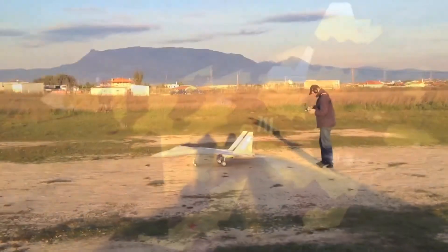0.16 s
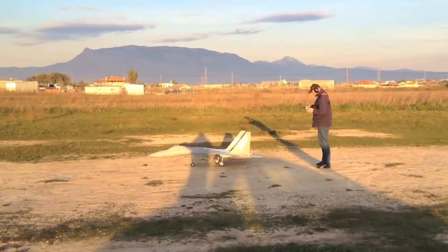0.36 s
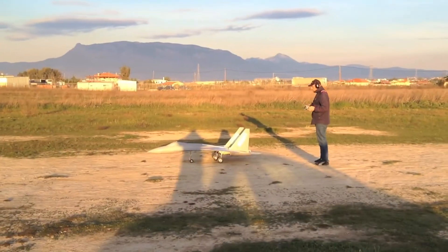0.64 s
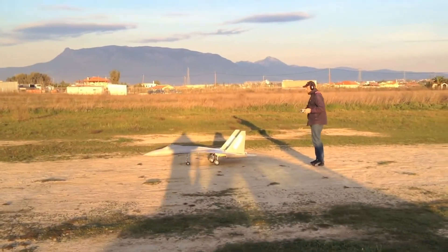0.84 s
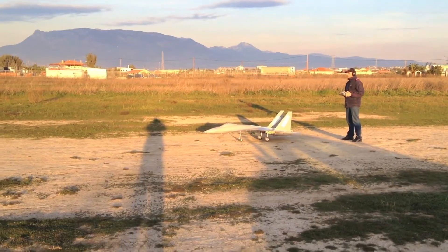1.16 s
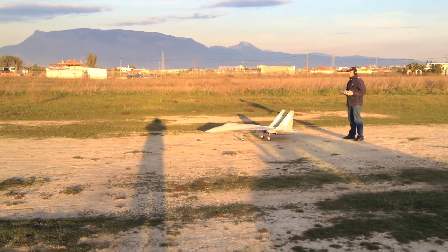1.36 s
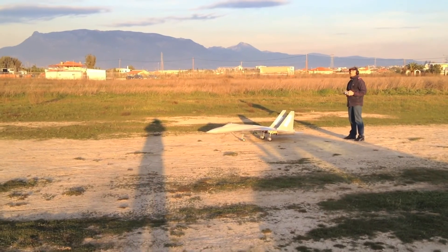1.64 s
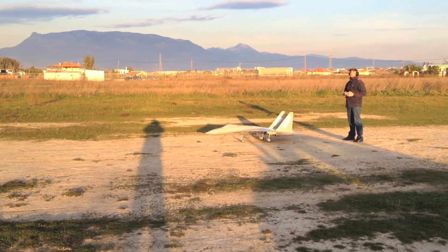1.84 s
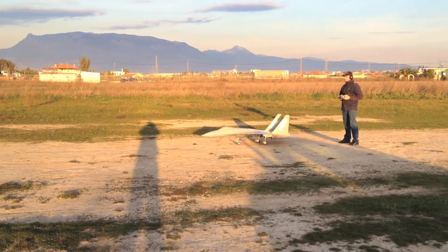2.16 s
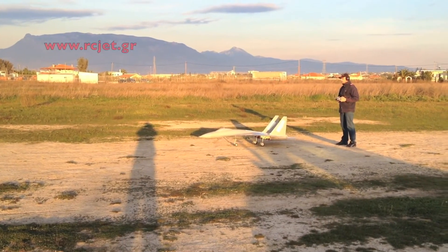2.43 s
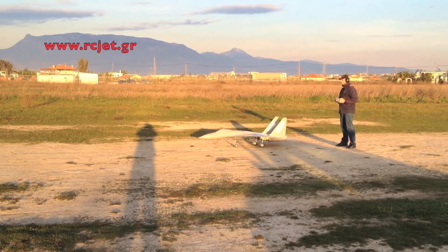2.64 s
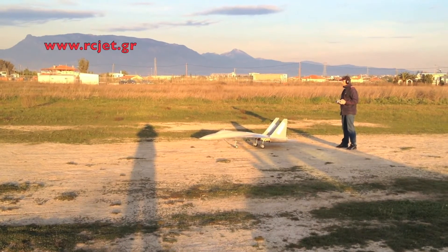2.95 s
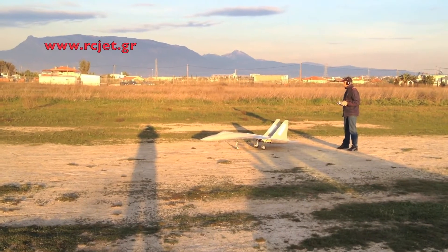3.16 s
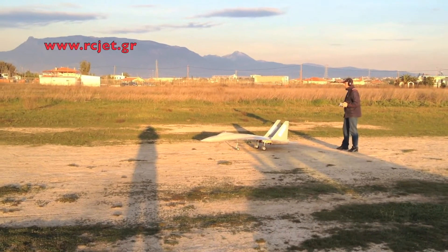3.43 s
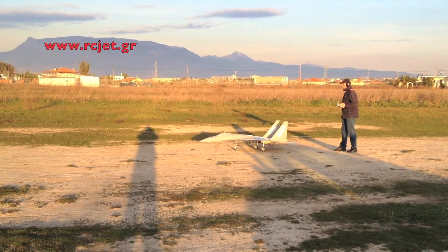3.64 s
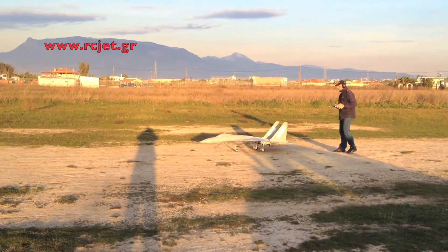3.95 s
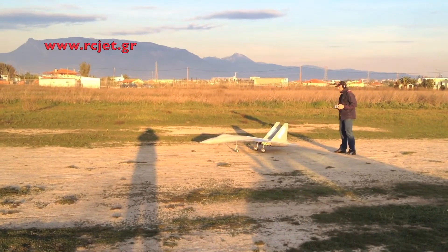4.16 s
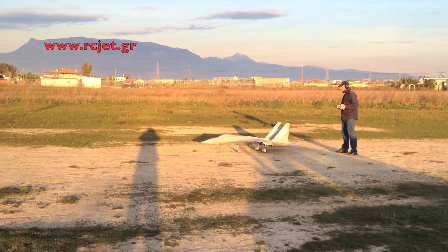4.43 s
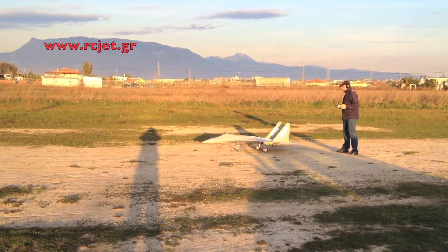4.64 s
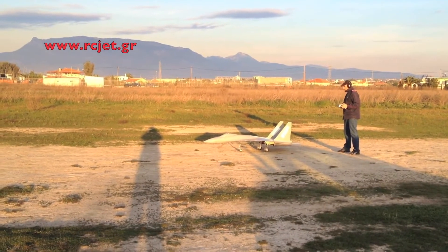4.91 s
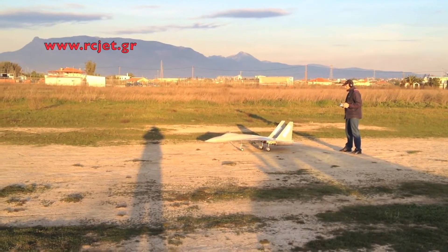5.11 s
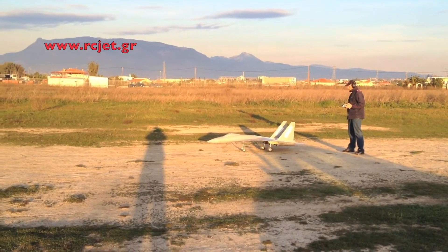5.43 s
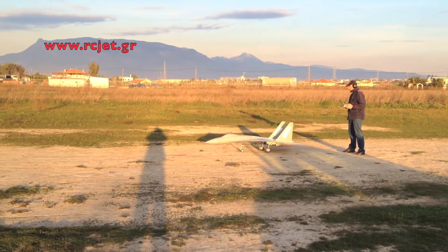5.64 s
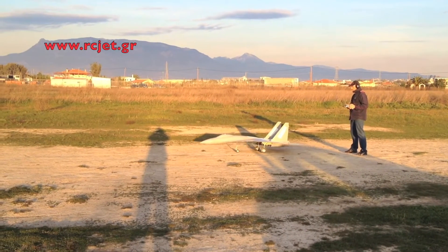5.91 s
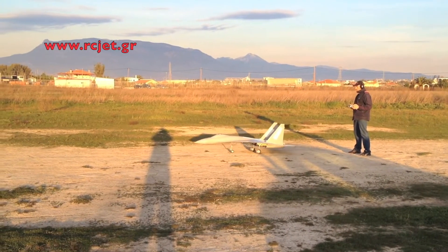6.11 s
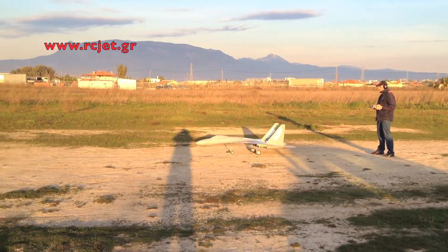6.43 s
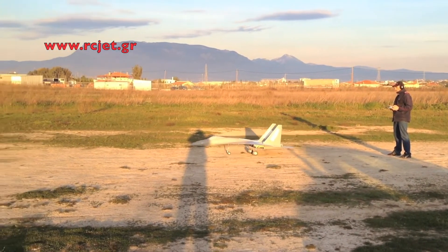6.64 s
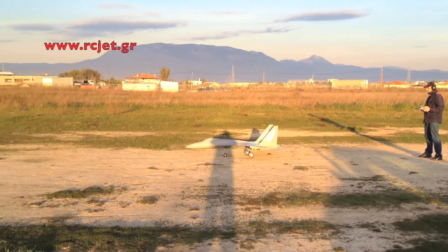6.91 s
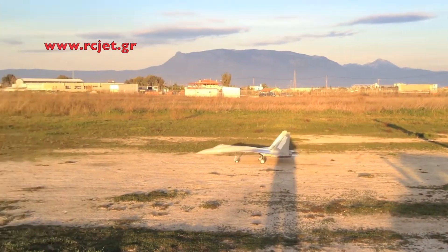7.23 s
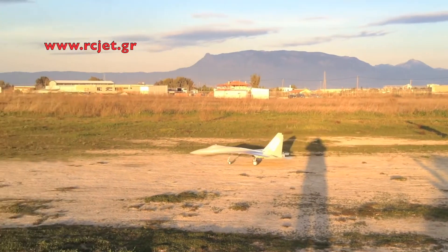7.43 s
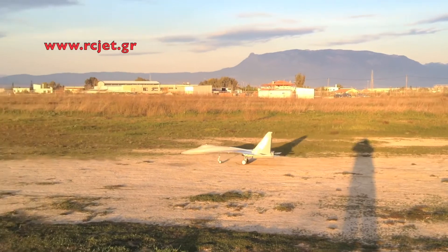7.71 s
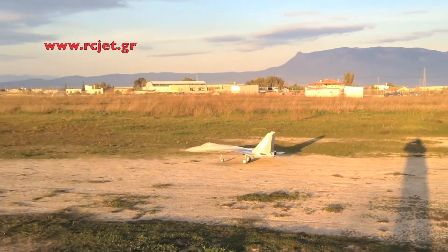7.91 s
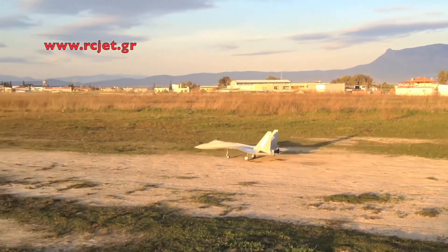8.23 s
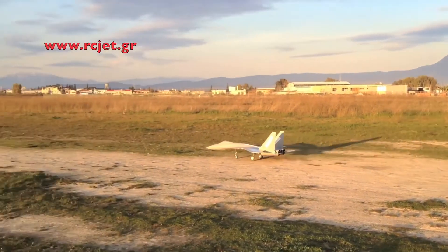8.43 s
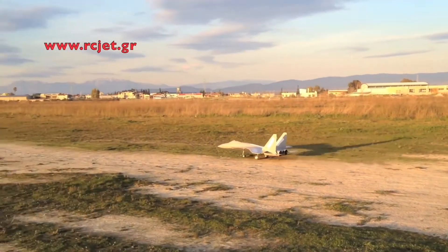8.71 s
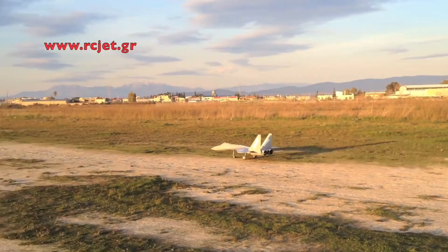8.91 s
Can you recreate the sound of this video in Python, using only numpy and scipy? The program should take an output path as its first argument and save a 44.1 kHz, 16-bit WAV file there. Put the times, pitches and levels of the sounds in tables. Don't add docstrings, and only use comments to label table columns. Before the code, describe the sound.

On an open airfield, two small model jet turbines idle with a high wavering whine over hissing roar. After about a second an abrupt cut brings a shriller held whine, beating slowly. From four seconds it climbs steeply, a low combustion howl rises, and the roar swells as the plane rolls past and away. Mono camera microphone, thin bass, ragged narrow treble.

```python
import sys
import numpy as np
from scipy import signal
from scipy.io import wavfile
from scipy.ndimage import uniform_filter1d

SR = 44100
rng = np.random.default_rng(int(sys.argv[2]) if len(sys.argv) > 2 else 0)


def transcribe(u):
    v = np.clip(np.atleast_2d(u).T, -1, 1)
    q = np.round(v * 32767).astype(np.int16)
    wavfile.write(sys.argv[1], SR, q)


def nominal_scale(level):
    x = np.asarray(level, float) / 20
    return 10 ** x


N = 399987
CUT_S = 0.968

# start_s, blade_hz
RUN_SPEED = [(.97, 5626), (2.07, 5752.5), (2.97, 5787.8), (3.77, 5910), (4.07, 5930), (4.27, 6024),
             (4.47, 6216.7), (4.68, 6520), (5, 7097), (5.32, 7878), (5.7, 9076), (5.85, 9450),
             (6.45, 11162), (6.75, 11439), (7.55, 11449), (7.8, 11581), (8.3, 12322), (9.1, 12576)]
# centre_hz, width_hz, level_db
HOUSING = [(348, 71, 3.5), (1100, 120, 0), (1365, 50, 2.5), (2220, 120, -1.5), (2500, 530, 1.5),
           (1620, 160, -1.5), (1865, 320, 2), (2967, 195, -8), (3484, 650, -4), (4180, 180, -3.5),
           (4570, 350, 4), (4863, 153, -12.5), (5360, 240, 4), (5866, 114, -9.5), (7190, 750, 2),
           (8250, 240, -7.5), (8900, 270, 2.5), (10250, 910, -10.5), (11160, 1560, 5), (12600, 250, -2),
           (13130, 250, -9), (14300, 330, -2), (15050, 300, -1)]


def evened(x):
    return x / np.sqrt(np.mean(x ** 2) + 1e-20)


def follow(rows, t):
    s, *columns = np.transpose(rows)
    return [np.interp(t, s, c) for c in columns]


def read(points, hz):
    f, value = np.transpose(points)
    return np.interp(np.log(hz + 1), np.log(f + 1), value)


def resonances_db(hz, bumps):
    return sum(db / (1 + (2 * (hz - f) / width_hz) ** 2) for f, width_hz, db in bumps)


def flutter(smooth_s):
    size = max(round(smooth_s * SR), 1)
    once = uniform_filter1d(rng.standard_normal((2, N)), size)
    return evened(uniform_filter1d(once, size))


def ground_comb(hz, state, echo_top_hz=1300):
    # state, first_notch_hz, strength_0_1
    ground = [
        (-2, 470, 0.18),
        (0, 480, 0.22),
        (1, 550, 0.09),
        (2, 513, 0.28),
        (3, 473, .48),
        (3.5, 390, 0),
    ]
    notch_hz, strength = follow(ground, state)
    echo = np.clip(strength, 0, 1) / (1 + (hz / echo_top_hz) ** 2)
    return abs(1 + echo * np.exp(1j * np.pi * hz / notch_hz))


def wall_comb(hz, t, spacing_hz=649, share=0.48):
    reached = (t < CUT_S) * (hz > 1.5 * spacing_hz) * (hz < 3500)
    return abs(1 - share * reached * np.exp(2j * np.pi * hz / spacing_hz))


def howl_db(hz, state, width_hz=250):
    # state, centre_hz, level_db over the roar
    howl = [
        (-1, 660, 8.5),
        (0, 680, 1.5),
        (0.81, 660, 12.5),
        (1.4, 684, 15.5),
        (1.5, 675, 12),
        (1.8, 610, 7.5),
        (2, 795, 9.5),
        (2.5, 660, 6.5),
        (3.1, 600, 2),
    ]
    centre_hz, level_db = follow(howl, state)
    return level_db / (1 + (2 * (hz - centre_hz) / width_hz) ** 4)


def jet_colour_db(hz, t, state, depth):
    # freq_hz, density_db (per Hz)
    idle_colour = [(53, -58.5), (90, -30), (150, -9.5), (341, -1), (471, -9.5), (2360, -22.5),
                   (3260, -29.5), (4500, -13.5), (6070, -25), (8030, -21.5), (8560, -23), (9540, -24),
                   (11300, -21), (15300, -31)]
    held_colour = [(53, -62), (90, -28.5), (195, -6), (491, -5), (681, 1.5), (841, -13), (2520, -17.5),
                   (3000, -24.5), (5350, -11.5), (5890, -16.5), (9000, -24), (11700, -47), (19800, -120)]
    held_treble = [(11000, -21), (15300, -41.5)]
    full_colour = [(53, -51), (90, -16), (227, -0.5), (724, -8), (1110, -11), (1350, -9.5), (2570, -16.5),
                   (2990, -20.5), (4500, -14), (8940, -15), (10200, -15), (11300, -14.5), (15300, -16.5)]
    roll_colour = [(53, -55), (90, -29), (208, 4), (513, -3), (841, -7), (1380, -3.5), (2310, -5),
                   (2990, -19), (4500, -4), (5820, -13.5), (7530, -8), (10400, -11.5), (11800, -9.5),
                   (15300, -20.5)]
    away_colour = [(53, -56), (90, -22), (232, 4), (396, -10.5), (571, 1), (1270, -9), (2030, -5.5),
                   (2920, -15.5), (4500, -6.5), (5820, -12), (7210, -6), (10400, -6.5), (11800, -6),
                   (15300, -12)]
    # centre_hz, width_hz, level_db at the last state
    behind = [(3440, 250, -4.5), (4560, 270, -3), (4850, 160, 10), (5270, 400, 2), (7800, 500, 3.5),
              (8700, 150, -9), (12950, 150, -10), (13150, 200, 8)]
    colour_db = 0
    for k, colour in enumerate((held_colour[:-2] + held_treble, full_colour, roll_colour, away_colour)):
        weight = np.maximum(1 - abs(np.clip(state, 0, 3) - k), 0)
        colour_db = colour_db + weight * read(colour, hz)
    colour_db = np.where(t < CUT_S, read(idle_colour, hz), colour_db)
    colour_db = colour_db + depth * resonances_db(hz, HOUSING)
    colour_db += np.clip(state - 2, 0, 1) * resonances_db(hz, behind)
    return colour_db + howl_db(hz, state)


def jets(patchy_db=0.97):
    # start_s, state (-1 idle, 0 held, 1 full, 2 rolling past, 3 away), roar_db
    jet_course = [(0, -1, -46.5), (.95, -1, -46), (.99, 0, -49.5), (2.95, 0, -47.5), (3.5, 0, -49),
                  (4.15, 0.5, -46.5), (5.35, 1.5, -37.5), (5.8, 1.5, -35), (6.3, 1.5, -35), (7.2, 2, -35),
                  (7.8, 2, -34.5), (8.6, 3, -30.5), (9.07, 3.5, -30)]
    # state, rumble_db, hiss_db, housing_depth
    blend = [
        (-1, -6.5, 2, 1.15),
        (-0.5, -4.5, 17.5, 1.55),
        (1.5, -6.5, 1.5, 1.14),
        (2, -3, 2, 1.06),
        (3, -12.5, -10, 1.3),
    ]
    frames, hz = N // 512 + 5, np.fft.rfftfreq(2048, 1 / SR)[:, None]
    t = np.arange(frames) * 512 / SR
    a, b, patches = rng.standard_normal((frames, 1025, 3)).T
    patches = evened(uniform_filter1d(uniform_filter1d(patches, 20, axis=0), 8, axis=1))
    state, roar_db = follow(jet_course, t)
    rumble_db, hiss_db, depth = follow(blend, state)
    shape = nominal_scale(jet_colour_db(hz, t, state, depth))
    shape = shape * ground_comb(hz, state) * wall_comb(hz, t)
    band = (hz[:, 0] > 900) & (hz[:, 0] < 8000)
    shape /= np.sqrt((shape[band] ** 2).sum(0))
    field_db = roar_db + rumble_db / (1 + (hz / 900) ** 2)
    field_db = field_db + hiss_db / (1 + (9000 / (hz + 1)) ** 4) + patchy_db * patches
    spectra = (a + 1j * b) * shape * nominal_scale(field_db)
    return signal.istft(spectra, nperseg=2048, noverlap=1536)[1][:N] / np.sqrt(1.5)


def read_housing(hz):
    grid_hz = np.arange(0, SR / 2, 10)
    return np.interp(hz, grid_hz, resonances_db(grid_hz, HOUSING))


def blade_level_db(t, blade_hz, side):
    # start_s, both_db, first_over_second_db
    blade = [(0, -59, -4), (.7, -63, 7), (.96, -67.5, 21), (1, -72, -0.5), (4.5, -71, 3), (5.1, -54.5, 10),
             (5.75, -63, 16), (6.28, -44.5, -12), (6.47, -50, 12), (6.7, -55, 8), (6.95, -51.5, -1),
             (7.3, -62, 26), (7.62, -70, 10), (7.95, -58, 20), (8.25, -64, 14), (8.4, -85, 0)]
    both_db, over_db = follow(blade, t)
    return both_db + side * over_db + 1.36 * read_housing(blade_hz) + 2.5 * flutter(0.05)


def whine_level_db(t, mean_hz, side, whine):
    # start_s, length_s, depth_db
    dropouts = [
        (4.44, 0.012, -9),
        (4.522, 0.018, -12),
        (4.98, .02, -6),
    ]
    both_db, tilt_db = follow(whine, t)
    for s, length_s, db in dropouts:
        both_db = both_db + db * np.exp(-((t - s) / length_s) ** 2)
    return both_db + side * tilt_db - 100 * (mean_hz > 7750)


def compressors(mean_hz, gap_hz, start_s, lead_turns, whine, third_db, flutter_db=1.4, jitter_turns=0.004):
    # start_s, level_db
    shaft = [
        (5, -97),
        (5.7, -52),
        (6.2, -67),
        (7.6, -51.5),
        (8.5, -66),
    ]
    blades_per_turn = 6
    t = np.arange(N) / SR
    side = np.array([[.5], [-.5]])
    gap_turns = np.cumsum(gap_hz * (t >= start_s)) / SR + lead_turns / 2
    turns = np.cumsum(mean_hz) / SR + side * gap_turns + jitter_turns * flutter(0.0026)
    whine_db = whine_level_db(t, mean_hz, side, whine)
    blade_db = blade_level_db(t, mean_hz + side * gap_hz, side)
    tone = nominal_scale(whine_db) * np.cos(4 * np.pi * turns)
    tone += nominal_scale(whine_db + third_db) * np.cos(6 * np.pi * turns)
    tone += np.sqrt(2) * nominal_scale(blade_db) * np.cos(2 * np.pi * turns)
    tone += nominal_scale(follow(shaft, t)) * np.cos(2 * np.pi * turns / blades_per_turn)
    return (tone * nominal_scale(flutter_db * flutter(0.0072))).sum(0)


def idle_compressors(t):
    # start_s, blade_hz, first_minus_second_hz
    idle_speed = [
        (0, 4405, 44.7),
        (.6, 4395.6, 11.2),
        (.7, 4394.8, 10),
        (.8, 4394.3, -1.28),
        (.9, 4394, 2.34),
        (1, 4394, -3.49),
    ]
    # start_s, both_db, first_over_second_db
    idle_whine = [(0, -35.5, 1), (.15, -37, 9), (.2, -38.5, 3), (.45, -40, 2), (.65, -38, -1),
                  (.77, -41.5, 7), (.87, -39, -6), (.96, -40, 3)]
    mean_hz, gap_hz = follow(idle_speed, t)
    return compressors(mean_hz, gap_hz, 0, 0.325, idle_whine, -23)


def run_compressors(t, inertia_s=0.2):
    # start_s, first_minus_second_hz
    run_gap = [(.97, 23.19), (1.43, 11.94), (1.87, 18.16), (2.28, 51.37), (2.53, 58.82), (2.95, 3.76),
               (3.16, -.59), (3.38, -27.94), (3.73, -36.73), (3.82, -35.08), (4.16, 1.37), (4.26, .15),
               (4.46, 1.7), (4.57, -2.3), (5, -40), (6.25, -290), (7.05, -60), (7.35, -40)]
    # start_s, both_db, first_over_second_db
    run_whine = [(.98, -29.5, -6.5), (1.25, -31, 4.5), (1.5, -30, -2.5), (2.1, -31, 6.5), (2.8, -30.5, 3.5),
                 (3, -30.5, -1), (3.1, -34.5, 7.5), (3.2, -30.5, 2.5), (3.9, -30, -2), (4.05, -29.5, 1.5),
                 (4.12, -32, -8), (4.25, -35.5, 13), (4.41, -32.5, -6), (4.57, -39, 3), (4.72, -47, 22),
                 (4.9, -41.5, 9), (5.15, -41, 0), (5.25, -49, 5.5)]
    mean_hz = uniform_filter1d(follow(RUN_SPEED, t)[0], round(inertia_s * SR), mode="nearest")
    gap_hz = follow(run_gap, t)[0]
    return compressors(mean_hz, gap_hz, run_gap[0][0], 0.125, run_whine, -200)


def scene():
    t = np.arange(N) / SR
    fade_s = 0.02
    fade = np.clip((t - CUT_S) / fade_s + .5, 0, 1)
    mono = jets() + idle_compressors(t) * (1 - fade) + run_compressors(t) * fade
    return np.array([mono, mono])


def passed_hz(t):
    # start_s, length_s, edge_hz
    glimpses = [(1.4, 0.15, 12400), (2.91, .05, 12100), (3.038, 0.17, 12300), (3.15, .04, 15350),
                (3.34, 0.21, 12400), (4.041, 0.26, 11310), (4.297, 0.096, 12300), (7.96, .07, 12300)]
    shut_hz, open_hz, top_hz = 9350, 12400, 15350
    relief_s, trail_hz = 4.42, 600
    whine_hz = 2 * follow(RUN_SPEED, t)[0]
    edge_hz = np.where(t < relief_s, shut_hz, np.clip(whine_hz - trail_hz, open_hz, top_hz))
    for s, length_s, hz in glimpses:
        edge_hz = np.where((t >= s) & (t < s + length_s), hz, edge_hz)
    return np.where(t < CUT_S, top_hz, edge_hz)


def starve(x, ragged_hz=180, whine_db=14, hole_db=10, chancy_db=5):
    hz, t, z = signal.stft(x, SR, window="cosine", nperseg=2048, noverlap=1024)
    edge_hz = passed_hz(t) + ragged_hz * rng.standard_normal(len(t))
    band_db = 10 * np.log10(abs(uniform_filter1d(abs(z) ** 2, size=9, axis=0)) + 1e-20)
    near_whine = band_db > band_db.max(0) - whine_db
    usual_db = np.median(band_db[(hz > 4000) & (hz < 9000)], axis=0)
    chance = uniform_filter1d(rng.standard_normal((len(t), 130)), size=4, axis=0)
    chance = chance.T[np.arange(len(hz)) // 8]
    hz = hz[:, None]
    threshold_db = usual_db - hole_db + chancy_db * chance * (hz > 9300)
    strong = (band_db > threshold_db) | (hz < 5600)
    keep = strong & ((hz < edge_hz) | near_whine) & (hz < 15350)
    return signal.istft(z * keep, SR, window="cosine", nperseg=2048, noverlap=1024)[1][:N]


def band_limit(x):
    return signal.sosfilt(signal.butter(12, 15670, fs=SR, output="sos"), x)


def record(dry):
    bass_cut = signal.butter(3, 115, "high", fs=SR, output="sos")
    mono = starve(signal.sosfilt(bass_cut, dry[0]))
    return band_limit(np.array([mono, mono]))


dry = scene()
out = record(dry)
transcribe(out)
```